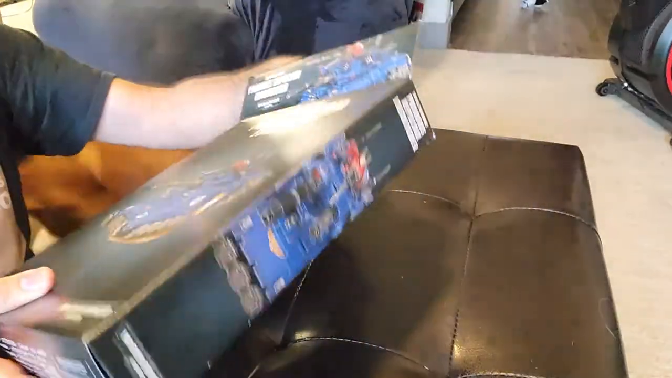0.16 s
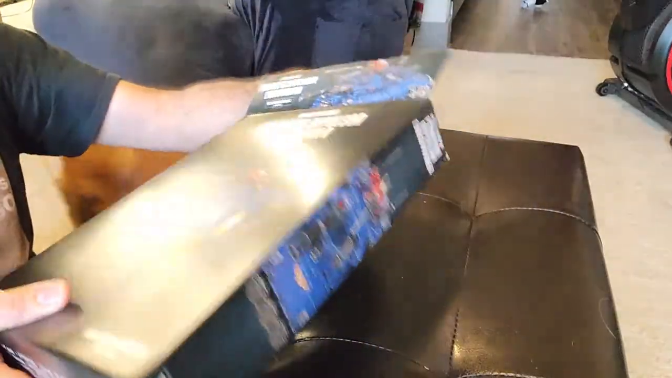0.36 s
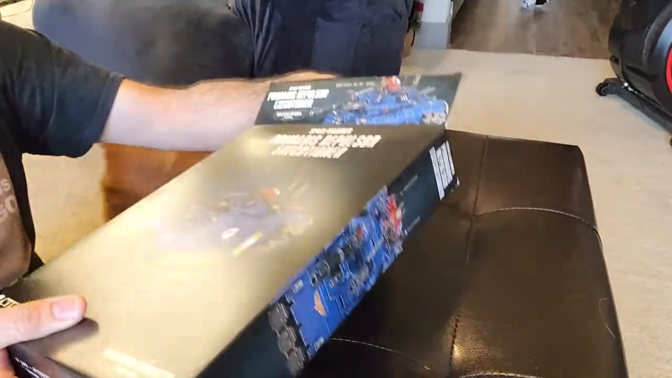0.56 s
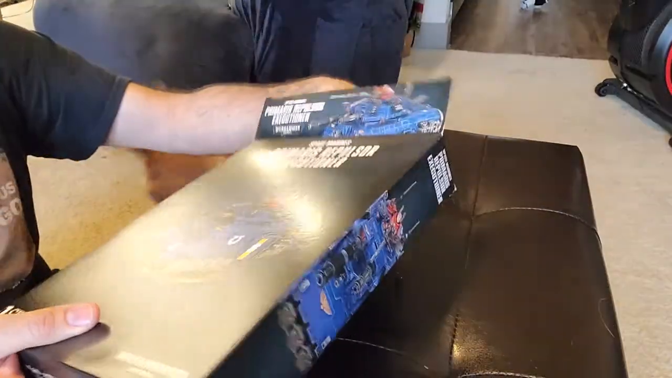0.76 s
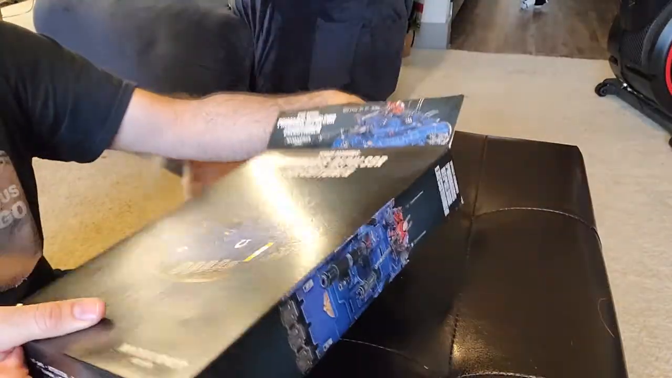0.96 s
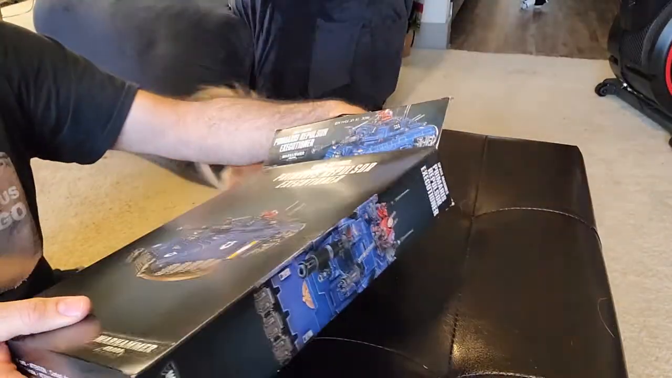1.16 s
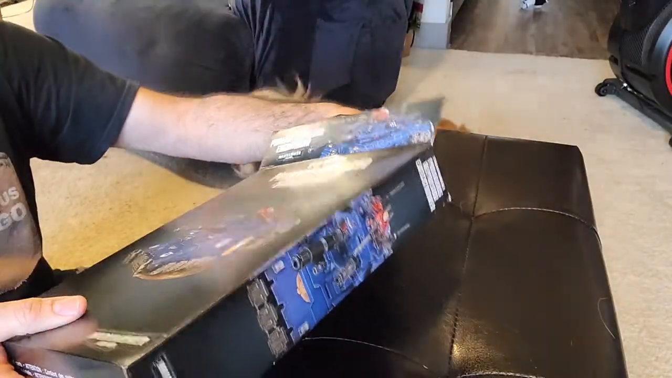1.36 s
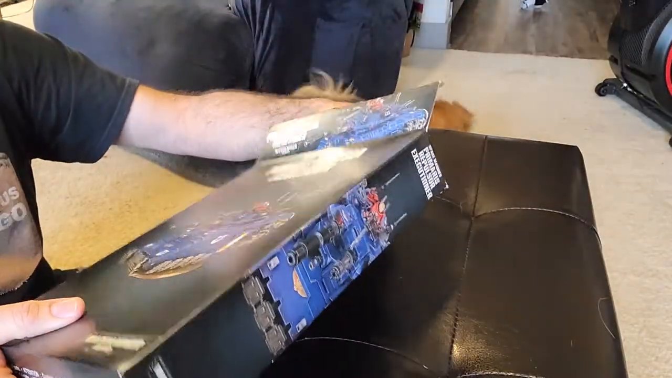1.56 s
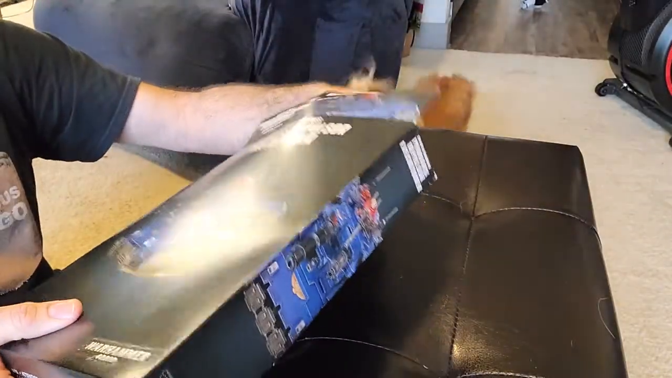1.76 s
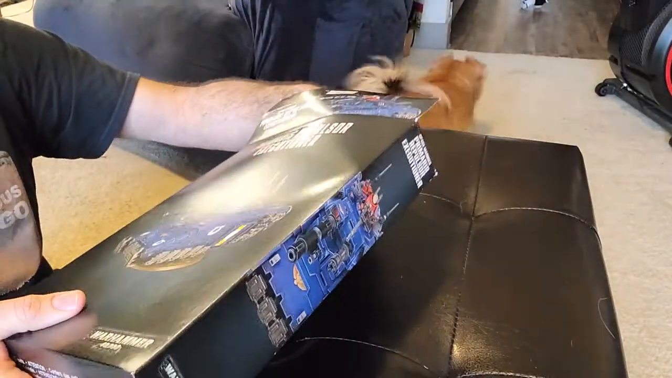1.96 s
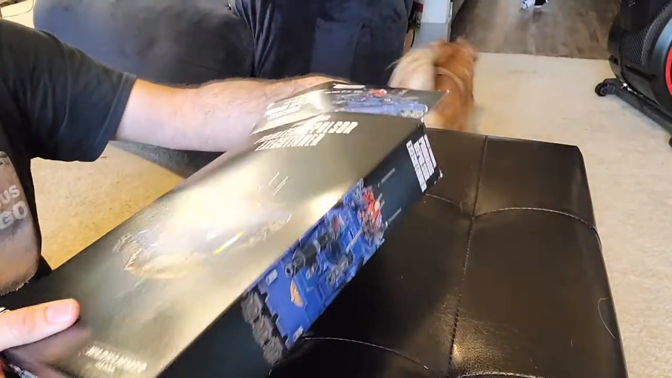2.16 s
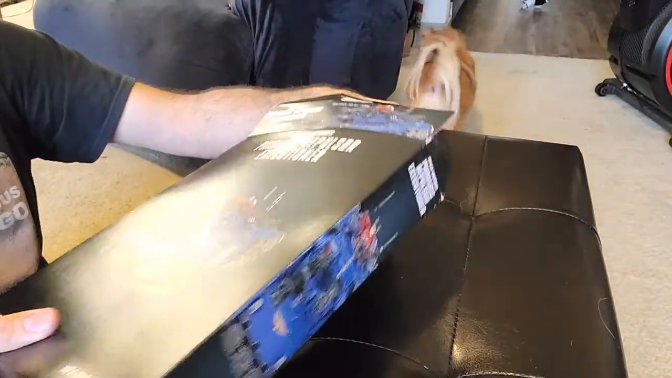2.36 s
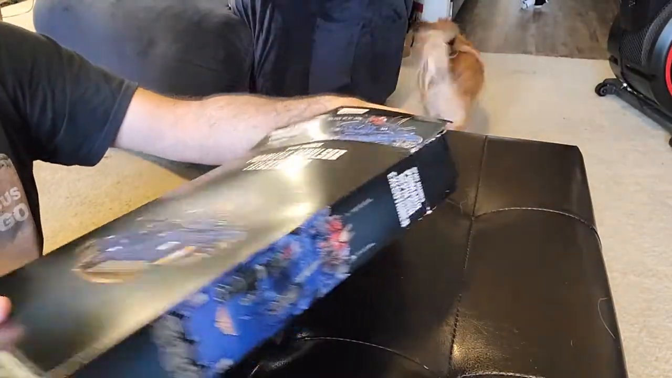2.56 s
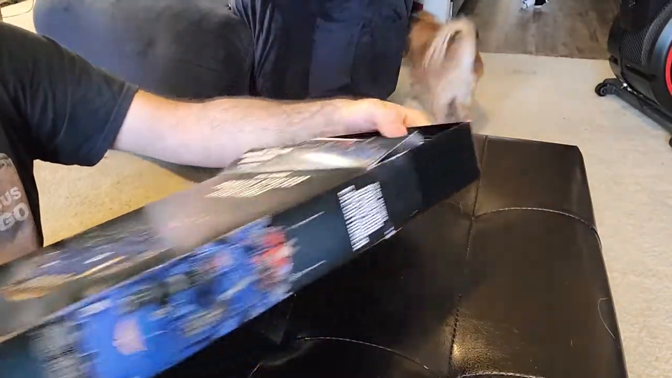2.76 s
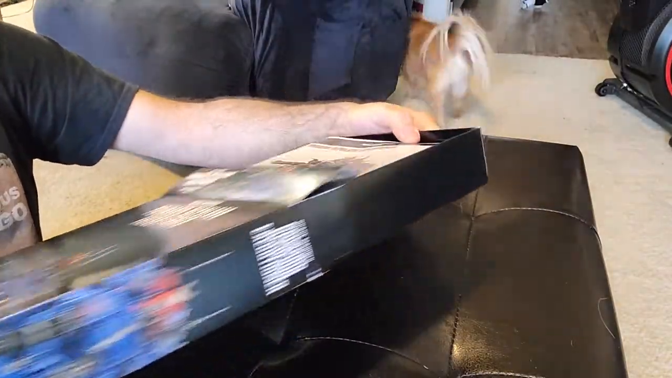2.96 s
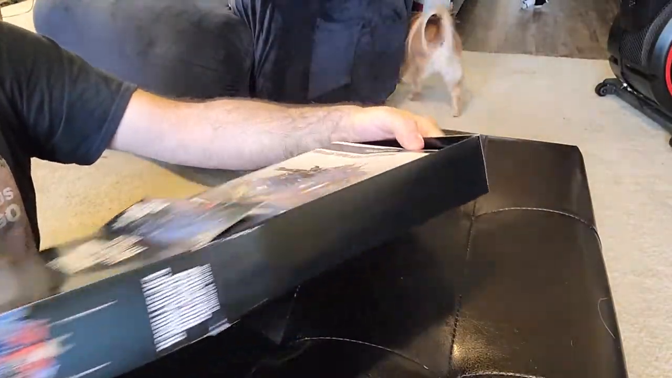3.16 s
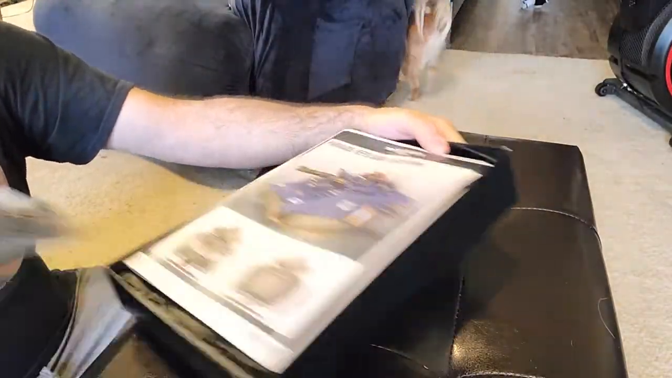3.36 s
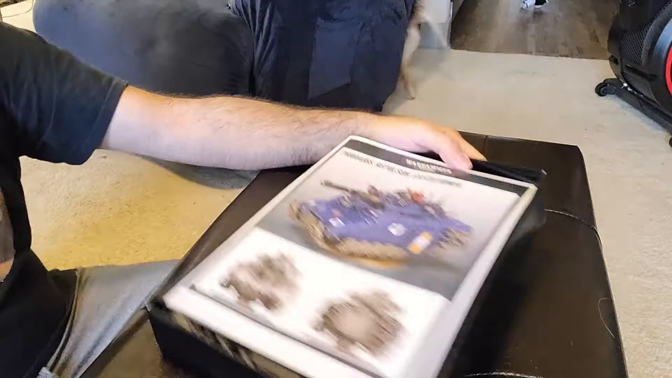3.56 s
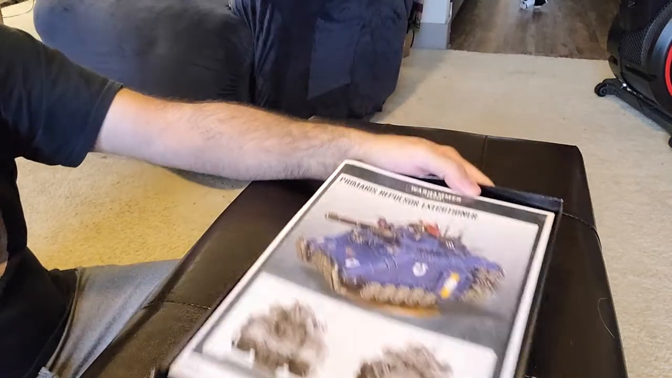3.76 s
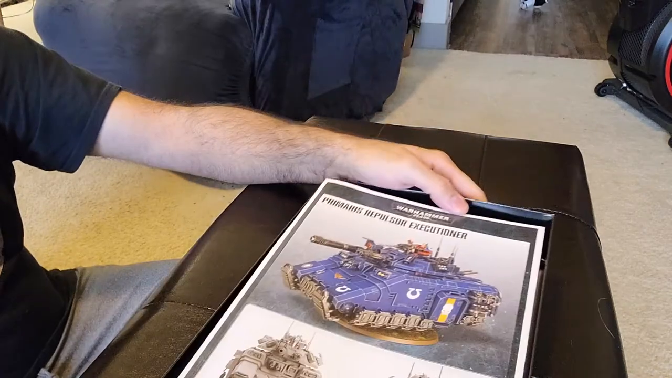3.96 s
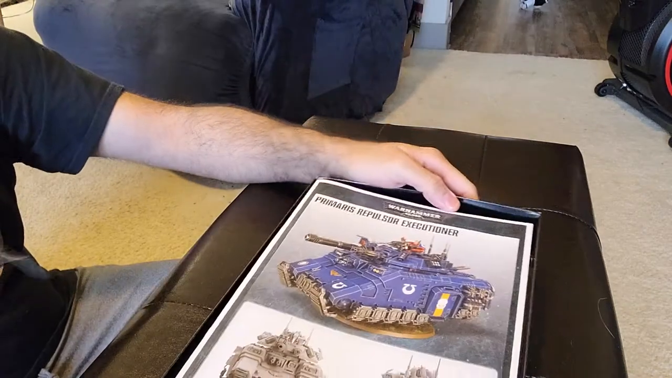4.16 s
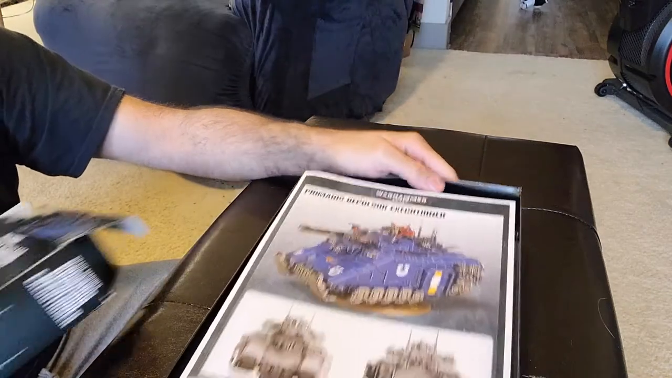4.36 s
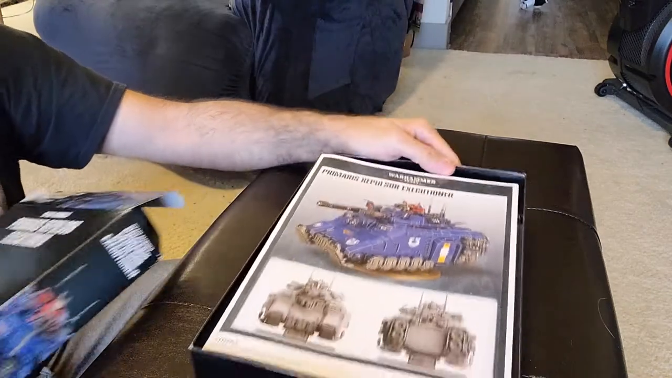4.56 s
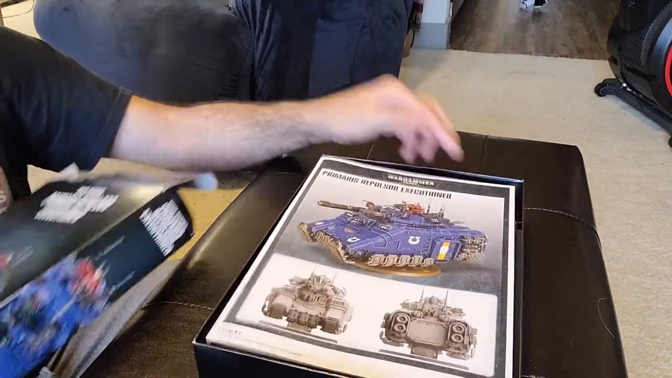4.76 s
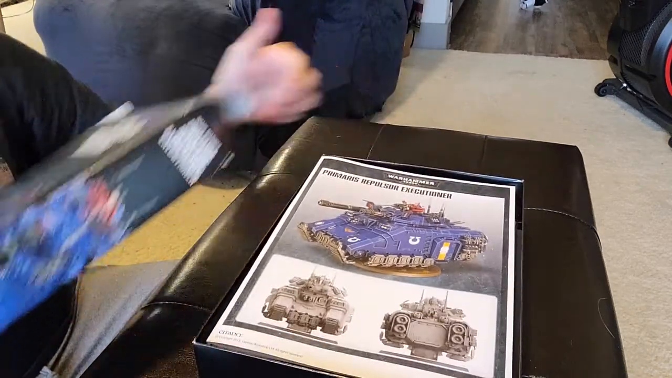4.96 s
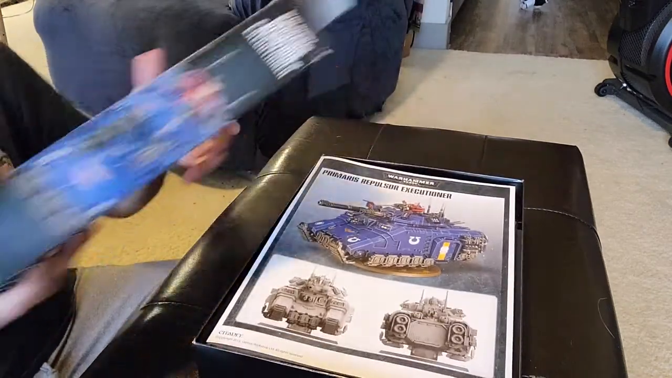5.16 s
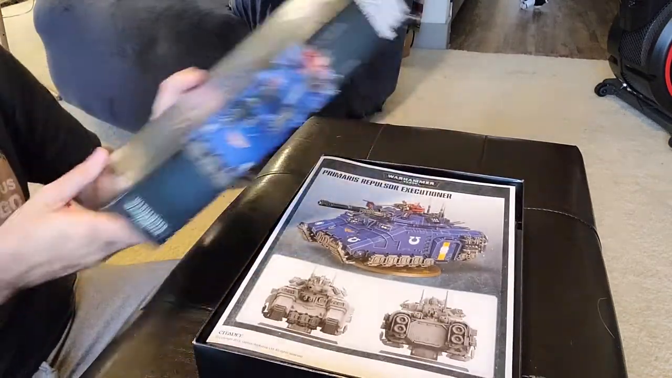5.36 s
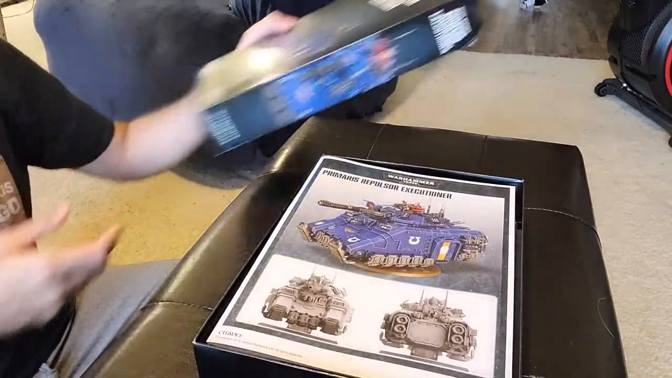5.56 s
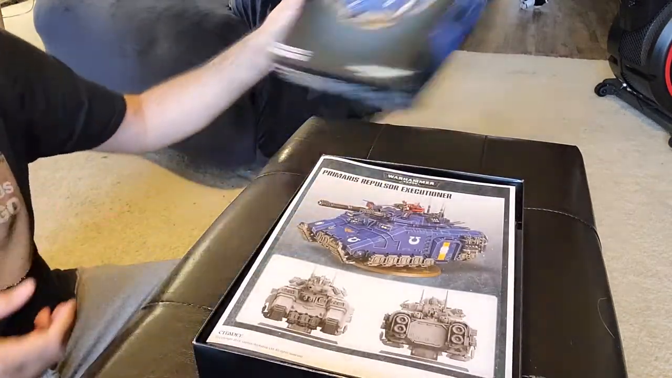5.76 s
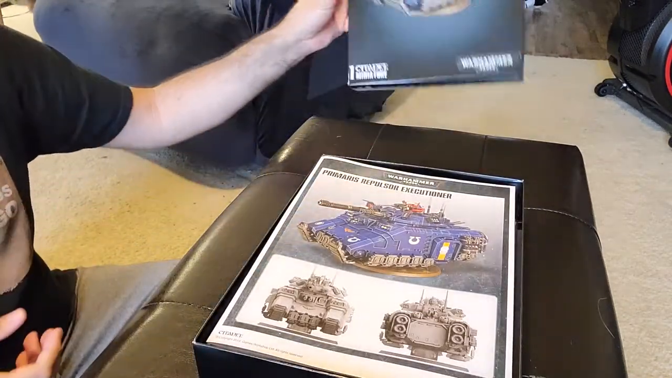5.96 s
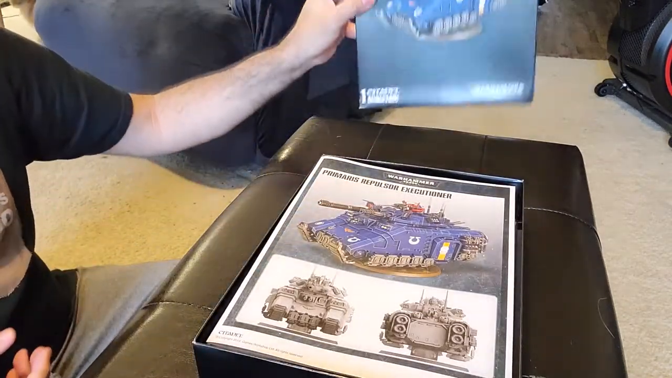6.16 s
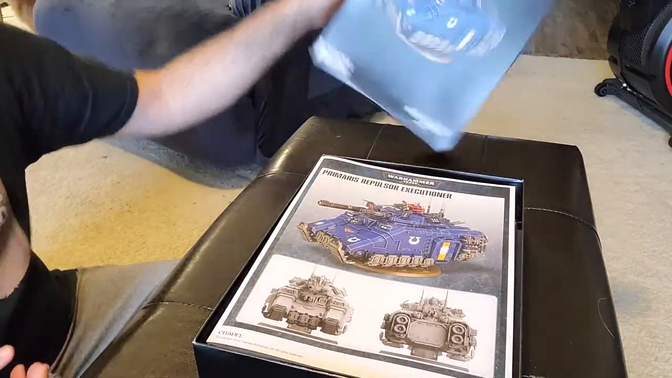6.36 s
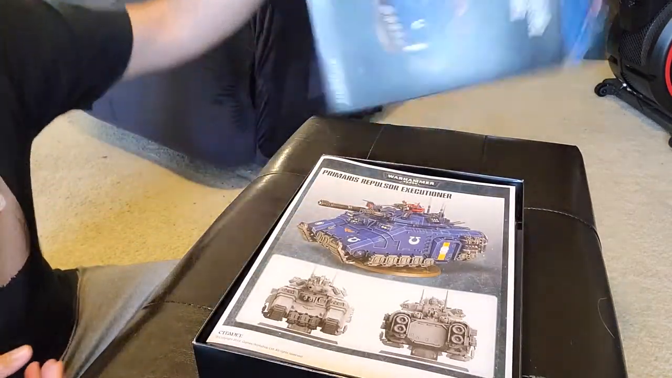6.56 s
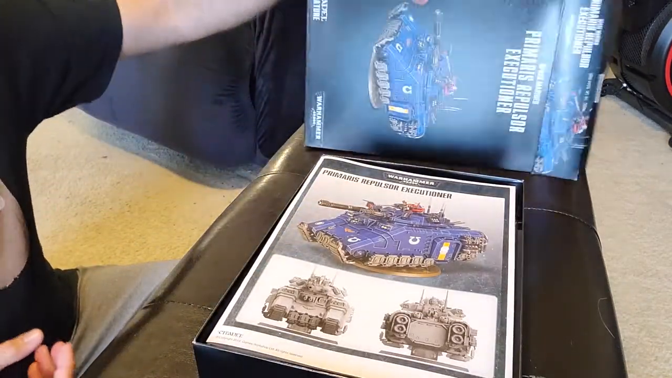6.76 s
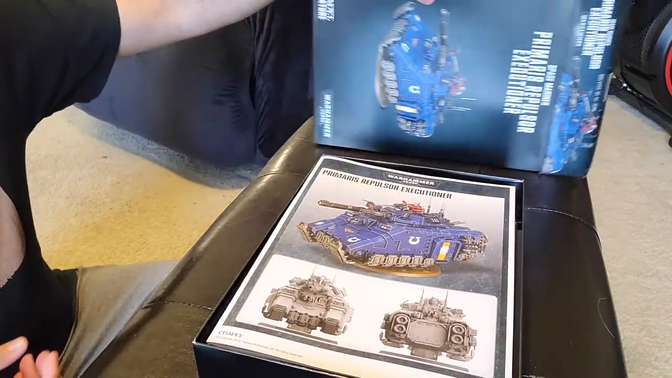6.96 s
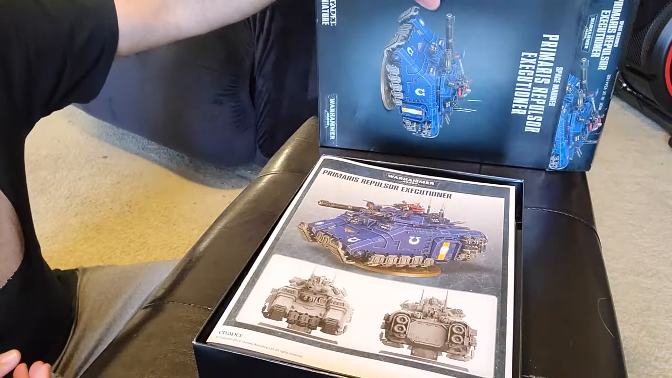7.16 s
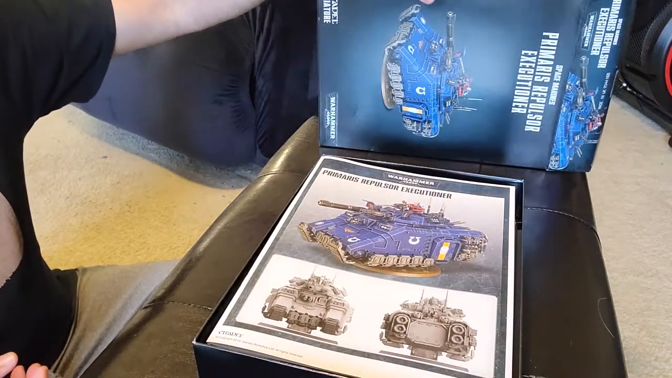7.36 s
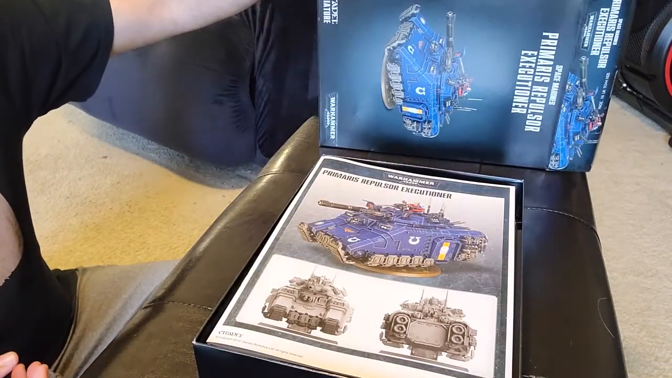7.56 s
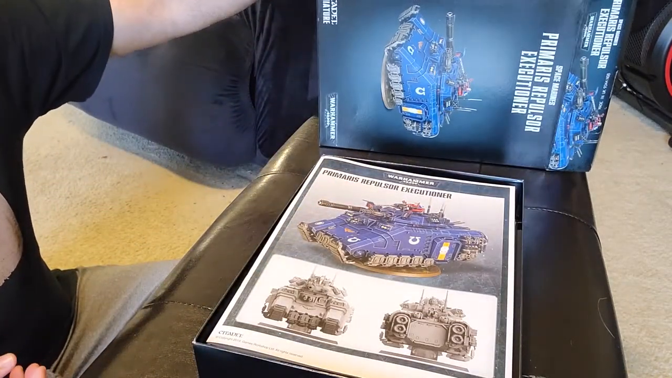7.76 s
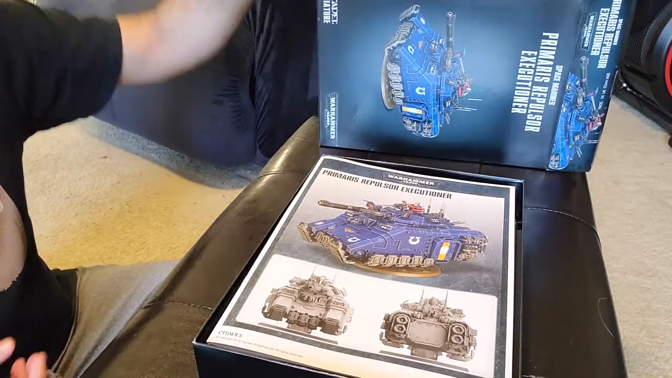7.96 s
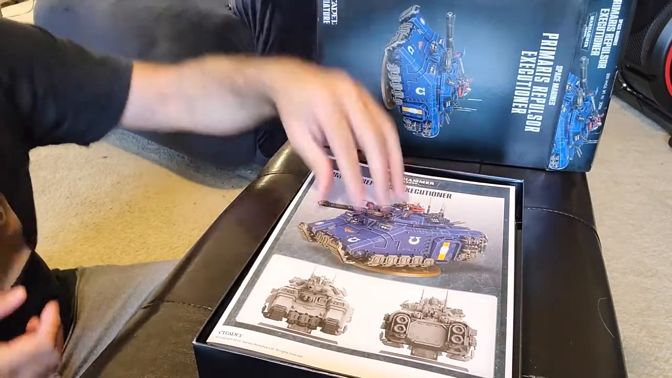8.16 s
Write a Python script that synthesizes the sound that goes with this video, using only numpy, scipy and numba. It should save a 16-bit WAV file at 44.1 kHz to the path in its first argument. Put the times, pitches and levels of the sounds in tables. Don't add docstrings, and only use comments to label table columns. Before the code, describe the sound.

Soft hollow cardboard knocks, then a rising rush of sliding card friction ending in a sharp loud pop, followed by quiet handling taps indoors.

```python
import sys
import numpy as np
from scipy import signal
from scipy.fft import rfft, irfft
from scipy.io import wavfile
from scipy.ndimage import uniform_filter1d, map_coordinates
from numba import njit

SR = 44100
rng = np.random.default_rng(int(sys.argv[2]) if len(sys.argv) > 2 else 0)


def boost(x):
    u = np.asarray(x, float) / 20
    return 10 ** u


def log_audio(samples):
    frames = np.atleast_2d(samples).T
    limited = np.clip(frames, -1, 1)
    pcm = np.round(limited * 32767).astype(np.int16)
    wavfile.write(sys.argv[1], SR, pcm)


N = 362766

# time_s, pressure_db, cavity_hz, grit_db (re pressure)
LOOSENING = [(0, -60.5, 607, 3.5), (.19, -63, 500, 2), (.41, -60, 565, -5.5), (.55, -86, 605, 12),
             (.8, -69, 703, -31), (1.0, -73.5, 680, 4.5), (1.28, -58, 749, -17), (1.5, -50, 670, -35),
             (1.6, -51, 716, -3.5), (1.9, -54.5, 538, 4), (2.06, -69, 625, -10), (2.2, -65.5, 586, -2)]
# time_s, pressure_db, cavity_hz, grit_db (re pressure)
PULLING = [
    (2.29, -40, 640, -20),
    (2.338, -32.5, 530, -9),
    (2.604, -26, 533, -4.5),
    (2.772, -26, 548, -2.5),
    (2.89, -31, 500, -0.5),
    (3.012, -30, 549, -5),
    (3.198, -27, 654, -5.5),
    (3.232, -32, 605, -10),
    (3.285, -33, 610, 2.5),
]
# time_s, pressure_db, cavity_hz, grit_db (re pressure)
HANDLING = [(3.36, -37.5, 646, 2), (3.499, -59.5, 608, 7.5), (3.66, -55, 642, -7.5),
            (3.79, -62.5, 582.4, 2), (4.07, -58, 709, -8.5), (4.29, -68, 567.5, 1.5),
            (4.43, -64.5, 552.4, 4.5), (4.619, -55.5, 683, -11.5), (4.78, -53, 685, -4),
            (5.0, -87, 607.5, 11), (5.3, -71.5, 559, 9.5), (5.57, -72, 721, 3.5), (5.851, -75.5, 723, -4),
            (6.29, -74, 657, -3), (6.6, -67.5, 621, -3.5), (6.921, -71, 621, 7.5), (7.2, -69, 628.7, -9.5),
            (8.16, -81.5, 654, -3)]
# peak_s, level_db, rise_s, fall_s, grit_db (re peak)
SCUFFS = [(0, -36, .02, 0.035, -11), (.684, -38, 0.086, 0.053, -6.5),
          (.78, -35.5, 0.041, 0.058, -4.5), (1.085, -55.5, 0.015, 0.057, -7),
          (.92, -60, 0.024, 0.038, -6), (1.44, -55, 0.045, 0.049, -5), (1.27, -44, 0.063, 0.12, -6.5),
          (1.586, -31, 0.022, 0.0094, -32), (1.668, -37.5, 0.052, 0.019, 0),
          (1.765, -34.5, 0.03, 0.049, -21), (1.9, -33, 0.042, 0.048, -8.5),
          (2.054, -48, 0.075, .1, 0.5), (2.231, -38, 0.0065, 0.0099, 4),
          (3.543, -39, 0.009, 0.012, -27), (3.689, -55, 0.15, 0.1, -6),
               (4.238, -60.5, 0.12, 0.045, -17), (4.665, -40, 0.045, 0.12, -4),
               (4.762, -46, 0.023, 0.051, -3), (5.17, -54.5, 0.012, 0.096, -4.5),
               (5.308, -55, 0.017, 0.089, -4), (5.358, -56.5, 0.044, 0.065, -10),
               (5.498, -49.5, 0.043, 0.032, 2), (5.72, -52.5, 0.012, 0.046, 1.5),
               (5.845, -56, 0.08, 0.18, -5), (6.077, -68.5, 0.039, 0.18, 7.5),
               (6.361, -41.5, 0.028, 0.079, 0.5), (6.643, -61, 0.2, 0.0097, -10),
               (6.765, -39.5, 0.053, 0.052, -8), (6.816, -47.5, 0.0082, 0.025, 5),
               (6.874, -39.5, 0.011, 0.02, -26), (7.141, -62.5, 0.056, 0.056, 0),
               (8.226, -45, 0.024, .05, 3.5)]
# peak_s, level_db, rise_s, fall_s
SWISHES = [
    (5.25, -77, 0.22, 0.36),
    (0.23, -63, 0.061, 0.055),
    (.412, -59.5, 0.034, 0.024),
    (1.586, -58.5, 0.053, 0.018),
    (3.69, -69.5, 0.11, 0.47),
    (4.134, -70, 0.026, 0.031),
    (4.42, -70.5, 0.14, 0.2),
    (4.675, -63, 0.01, 0.03),
    (4.85, -79, 0.062, 0.19),
    (1.45, -77, 0.037, .03),
]
# peak_s, level_db, rise_s, fall_s
BENDS = [(0, -57, .05, 0.16), (.2, -59.5, 0.16, 0.32), (.466, -58, 0.16, 0.032), (.686, -64, 0.076, .045),
         (1.4, -59, 0.23, 0.33), (1.67, -31.5, 0.1, 0.05), (1.88, -42, 0.071, 0.064),
         (2.64, -30.5, 0.03, 0.029), (2.9, -44.5, 0.072, 0.7), (3.276, -32, 0.062, 0.041),
         (3.34, -37.5, 0.11, 0.13), (4.18, -55, 0.14, 0.051), (4.7, -44, .08, 0.04),
         (4.78, -51, 0.13, 0.14), (5.345, -42, 0.11, 0.06), (5.2, -56.5, 0.052, 0.085),
         (6.79, -33.5, 0.067, 0.022), (6.85, -38.5, 0.023, 0.063), (8.226, -54, 0.12, .05)]


def rubbing():
    grip_db, cavity_hz, grit_db = curves(LOOSENING + PULLING + HANDLING)
    scuffs = SCUFFS
    ringing = boost(grip_db) + swells([row[:4] for row in scuffs])
    grit_rows = [(s, db + grit, rise, fall) for s, db, rise, fall, grit in scuffs]
    scuffing = swells(grit_rows, steep=0.97)
    scraping = boost(grip_db + grit_db) + scuffing
    hissing = boost(grip_db + grit_db - 23) + boost(-25) * scuffing + swells(SWISHES)
    flexing = boost(-21) * ringing + swells(BENDS)

    catch = boost(0.9 * walk(40) + 0.8 * walk(150))
    body = box_body(slips(rate=350, spread_db=2.2, bed=1.2) * catch, cavity_hz)
    edges = [edge_friction(catch, cavity_hz, db, scraping, hissing) for db in (-4.5, -4, -4)]
    flex = [panel_flex(db) * flexing for db in (-3.5, -12, -12)]
    return ringing * body + edges[0] + flex[0], np.array(edges[1:]) + flex[1:]


# pitch_hz, width_hz, level_db
PANELS = [(549, 110, -8), (1620, 14, -32.5), (2710, 480, -30.5), (3140, 89, -20.5)]


def box_body(drive, cavity_hz):
    cavity = band(band(drive, cavity_hz, 130), cavity_hz, 420)
    extra_modes = band(drive, 0.57 * cavity_hz, 150) + band(drive, 3.1 * cavity_hz, 120)
    walls = sum(boost(db) * band(drive, hz, width) for hz, width, db in PANELS)
    low_wall = band(band(drive, 410, 160), 450, 430)
    return level(cavity, -6.0) + level(extra_modes, -27.5) + level(walls, -12.0) + level(low_wall, -14.5)


# pitch_hz, level_db (per Hz)
SCRAPE = [(530, -27), (900, -5), (1660, -4.5), (2280, -11.5), (2630, -7.5), (4400, -12), (4900, -13.5),
          (7500, -12.5), (9750, -24), (16500, -120)]
# time_s, share
SHADE = [(0, .01), (.5, 0.078), (.75, 0.26), (1.3, 0.5), (1.5, .1), (1.68, 0.35), (1.9, 0.34), (2.3, .01),
         (3.3, .01), (4.5, 0.009), (4.72, 0.3), (5.0, 0.4), (5.5, 0.39), (6.3, 0.47), (6.8, 0.41),
         (8.2, 0.46)]


def edge_friction(catch, cavity_hz, share_db, scraping, hissing):
    fine = slips(rate=2500, spread_db=2.5, bed=1.0) * catch
    drift = (uniform_filter1d(cavity_hz, 4000) / 580) ** 0.9
    scrape = level(colour(patchy(fine, 899, drift, count=13), SCRAPE), share_db)
    scrape = scrape - np.clip(curves(SHADE)[0], 0, 1) * band(scrape, 5700, 7000)
    hiss = level(band(band(fine, 10500, 11000), 11000, 12000), share_db + 13.0)
    return scraping * scrape + hissing * hiss


def patchy(x, low_hz, drift, count):
    centres = low_hz * 2 ** ((np.arange(count) + 0.76 * rng.random(count)) / 5)
    out = 0.3 * x
    for hz in centres:
        moving_hz = hz * drift * (1 + 0.055 * walk(6))
        out = out + boost(3.5 * walk(18)) * band(x, moving_hz, 35 + 0.065 * hz)
    return out


def panel_flex(db):
    return level(band(band(rng.standard_normal(N), 89, 220), 120, 290), db)


def slips(rate, spread_db, bed):
    chance = rng.random((3, N))
    sign = np.sign(chance[1] - 0.5)
    clicks = (chance[0] < rate / SR) * sign * boost(-spread_db * np.log(chance[2] + 0.11))
    return level(clicks, 0) + bed * rng.standard_normal(N)


# start_s, length_s, from_hz, to_hz, level_db
STREAKS = [(0.17, 0.13, 2700, 3000, -61.5), (0.36, 0.051, 3000, 2940, -57), (0.39, 0.034, 2740, 2870, -53),
           (0.078, .3, 510, 420, -65), (0.62, 0.28, 455, 460, -53), (1.383, 0.093, 430, 480, -52.5),
           (1.28, 0.086, 3100, 3600, -65), (0.39, 0.02, 6000, 4800, -55), (1.487, 0.059, 3200, 2900, -62.5),
           (1.565, 0.037, 5400, 4660, -58), (1.657, 0.023, 1140, 1140, -40.5),
           (1.733, 0.03, 1500, 1130, -45.5), (1.741, 0.045, 2000, 2030, -49.5),
           (6.41, 0.063, 1770, 1640, -58.5), (2.43, .11, 710, 800, -35.5), (2.64, 0.16, 810, 885, -37),
           (2.327, 0.23, 1285, 1830, -42.5), (2.3, 0.21, 1700, 1660, -45.5), (2.4, 0.17, 1990, 2160, -48.5),
           (2.71, 0.33, 1860, 2110, -42), (2.4, 0.54, 2500, 2720, -42.5), (2.65, 0.35, 995, 1176, -41),
           (2.92, 0.12, 995, 1028, -36.5), (2.928, 0.084, 1700, 1660, -36.5), (2.8, 0.44, 1994, 2225, -46),
           (3.015, 0.21, 1301, 1230, -41), (3.1, 0.17, 3000, 3420, -52.5), (3.249, 0.097, 265, 274, -39),
           (3.373, 0.042, 1930, 3300, -40), (3.524, 0.045, 266, 280, -45.5), (3.528, 0.032, 960, 1070, -49),
           (4.537, 0.052, 2800, 3400, -66), (4.68, 0.069, 1570, 1450, -56), (4.748, 0.068, 1600, 1540, -54),
           (4.747, 0.1, 3150, 3000, -62), (5.159, 0.046, 980, 994, -66.5), (5.3, 0.12, 3500, 3600, -67),
           (5.31, 0.026, 990, 1030, -52), (5.473, 0.04, 2160, 1200, -52), (5.712, 0.039, 1230, 1160, -58.5)]


def streaks():
    out = np.zeros(N)
    drive = slips(rate=500, spread_db=3.0, bed=0.83) * boost(3.0 * walk(50))
    for s, length, from_hz, to_hz, db in STREAKS:
        n, i = int(length * SR), int(s * SR)
        hz = np.linspace(from_hz, to_hz, n)
        swell = np.sin(np.pi * np.arange(n) / n) ** 0.81
        out[i:i + n] += swell * level(band(drive[i:i + n], hz, 0.049 * from_hz), db)
    return out


# start_s, peak_db, ring_hz, ring_t60_s
THUDS = [(.618, -42, 700, 0.028), (0.646, -39, 480, .03), (.672, -34, 760, .03), (.764, -30, 816, 0.033),
         (1.074, -41.5, 722, .053), (1.201, -43, 445, 0.098), (1.547, -32, 620, 0.08),
         (1.5685, -30, 730, 0.07), (1.63, -15.5, 359.5, 0.048), (1.638, -16.5, 558, 0.034),
         (1.654, -33, 780, .068), (1.753, -32, 620, .049), (1.827, -32, 704, 0.04),
         (1.877, -24.5, 521, 0.057), (2.27, -30, 737, 0.055), (2.632, -7, 521, 0.042),
         (2.681, -17.5, 575, 0.043), (3.267, -23, 610, 0.044), (3.29, -27, 287, 0.12),
         (3.306, -19.5, 435, .05), (3.693, -44, 630, 0.049), (4.078, -44.5, 630, 0.057),
         (4.455, -45.5, 527, 0.13), (6.355, -33.5, 760, .07), (6.744, -32.5, 575, 0.041),
         (6.863, -32.5, 637, .045), (7.149, -52.5, 620, 0.043)]
# start_s, peak_db, ring_hz, crack_db (re peak), crack_hz
SNAPS = [(.033, -34.5, 457, -10.5, 3070), (0.2016, -29.5, 780, 1.5, 3700), (.896, -52, 770, -2, 1460),
         (1.288, -33.5, 718, -19, 3320), (2.23, -35.5, 492, -23, 1440), (3.297, -23, 514, -6, 2500),
         (3.3160, -9, 743, 4.5, 1330), (3.323, -12.5, 569, -7, 1100), (3.5316, -33.5, 853, -27, 979),
         (3.599, -55, 250, 4, 6960), (4.121, -41.5, 770, -1, 3410), (4.571, -42, 930, 3.5, 1500),
         (4.668, -38, 730, 15.5, 6170), (4.748, -30, 727, 6.5, 4560), (5.152, -47, 615, -6, 2194),
         (5.298, -39.5, 514, -6, 2230), (5.714, -49, 710, -6.5, 1330), (6.731, -27, 564, 2.5, 2160),
         (6.8125, -35, 674, -18, 1400), (8.197, -42.5, 933, -8, 4500)]


def blows():
    thuds = [(s, db, hz, -23 - 0.3 * (db + 28.5), 1500, t60) for s, db, hz, t60 in THUDS]
    snaps = [(*row, 0.16) for row in SNAPS]
    return sorted(thuds + snaps)


# pitch_hz, level_db (per Hz)
CRACK = [(700, -29), (1400, -0.5), (3300, 3.5), (7000, -1.5), (10000, -5.5), (13000, -3.5), (16000, -12)]


def knocks():
    out, t = np.zeros(N + SR), np.arange(SR // 3) / SR
    for s, peak_db, hz, crack_db, crack_hz, t60 in blows():
        noise = rng.standard_normal((2, len(t)))
        fade = decay(t, max(t60, 0.01))
        push = 1.1 * np.sin(2 * np.pi * hz * t) * (t < 1.5 / hz)
        rattle = push + noise[0] * fade
        ring = band(rattle, hz, 0.05 * hz) + 0.63 * band(rattle, 0.62 * hz, 0.91 * hz)

        chatter = boost(2.5 * np.repeat(noise[0, ::90], 90)[:len(t)])
        snap = noise[1] * chatter * (np.exp(-t / 0.0072) + 0.15 * fade)
        snap[0] = 4.9
        crack = 0.47 * colour(snap, CRACK) + band(snap, crack_hz, 0.38 * crack_hz)

        blow = 1.2 * ring / np.abs(ring).max() + boost(crack_db) * crack / np.abs(crack).max()
        i = int((s + 0.0015) * SR)
        out[i:i + len(t)] += boost(peak_db) * blow
    return out[:N]


# start_s, peak_db, pitch_hz
THUMPS = [(0.467, -39.5, 61), (0.723, -39.5, 41), (1.624, -28, 105), (1.659, -31, 63), (1.879, -42, 72),
          (2.628, -24.5, 119), (3.293, -26, 113), (3.314, -25, 185), (4.669, -42, 173), (5.296, -40, 67.4),
          (5.339, -37, 86), (6.743, -29, 198), (6.756, -27.5, 108), (6.777, -29, 77), (6.829, -30, 96)]


def thumps():
    out, t = np.zeros(N + SR), np.arange(SR // 3) / SR
    envelope = np.exp(-t / 0.015) * (1 - np.exp(-t / 0.002))
    for s, peak_db, hz in THUMPS:
        i = int(s * SR)
        out[i:i + len(t)] += 1.4 * boost(peak_db) * np.sin(2 * np.pi * hz * t) * envelope
    return out[:N]


# start_s, peak_db, ring_hz, ring_t60_s
TICKS = [(0.203, -33, 5840, 0.0044), (.416, -32.5, 6170, 0.0046), (.417, -41, 12500, .002),
         (.656, -41, 1700, 0.015), (0.748, -52, 1620, .01), (0.761, -44, 1790, .01),
         (1.296, -42.5, 3440, 0.013), (1.738, -42, 2090, .012), (2.044, -44, 1570, .012),
         (4.573, -32, 11500, .002), (1.203, -52, 6000, .002), (1.568, -43, 4800, .012),
         (1.641, -34, 5500, .003), (1.662, -34.5, 2010, 0.013), (1.88, -35.5, 6140, .003),
         (2.640, -15.5, 1560, 0.015), (3.268, -25, 3180, 0.012), (3.299, -16, 2802, 0.0028),
         (3.3168, -7.5, 4000, .002), (3.3172, -8, 11500, .002), (3.320, -8, 3300, 0.0067),
         (3.3245, -16, 3300, .004), (3.328, -17, 3300, .004), (3.347, -26, 2000, .006),
         (3.534, -44, 2870, .012), (3.634, -39, 1520, 0.014), (4.562, -42, 9000, .001),
         (4.636, -44, 2820, .01), (4.660, -33, 2800, 0.012), (4.669, -15.5, 9300, 0.004),
         (4.670, -23, 13600, .002), (4.680, -33, 12800, .002), (4.735, -39, 3050, .012),
         (4.757, -39, 12500, .002), (4.771, -40, 3000, .003), (4.801, -42, 3020, 0.013),
         (4.89, -52.5, 5500, 0.009), (5.154, -56.5, 6100, 0.0021), (5.302, -44.5, 2200, 0.013),
         (5.471, -45, 1820, .012), (5.49, -46, 2970, 0.011), (5.716, -54, 3950, .01),
         (6.351, -38.5, 1490, 0.016), (6.732, -26, 3800, 0.004), (6.734, -29, 7600, .003),
         (6.741, -33, 3800, .005), (6.751, -36, 7000, .003), (6.814, -38, 3200, 0.0033),
         (6.864, -33, 1520, 0.0069), (8.199, -46.5, 3770, .008)]


def ticks():
    out, t = np.zeros(N + SR), np.arange(SR // 20) / SR
    for s, peak_db, hz, t60 in TICKS:
        burst = rng.standard_normal(len(t)) * np.exp(-t / 0.0015)
        ring = band(burst, hz, 1.5 / max(t60, 0.001))
        click = ring / np.abs(ring).max() + 0.22 * band(burst, hz, 1.0 * hz)
        i = int(s * SR)
        out[i:i + len(t)] += boost(peak_db) * click / np.abs(click).max()
    return out[:N]


# jump_s, peak_db, half_length_s
SLAPS = [
    (3.3170, -2.5, 0.00041),
    (3.3207, -7.5, .0003),
    (3.326, -9, 0.00095),
]


def slaps():
    t = np.arange(N) / SR
    out = np.zeros(N)
    for s, db, half in SLAPS:
        out += boost(db) * np.sign(t - s) * np.clip(1 - np.abs(t - s) / half, 0, 1)
    return out


# start_s, length_s, pitch_hz, level_db
SQUEAKS = [
    (0.217, 0.024, 11300, -49),
    (3.594, .018, 5800, -63),
    (3.597, 0.016, 7140, -60),
    (3.596, .018, 2900, -60),
    (4.111, 0.033, 750, -45.5),
    (5.162, 0.018, 2140, -58.5),
    (4.5, 0.021, 4050, -76),
    (5.437, 0.03, 3746, -62.5),
]


def squeaks():
    out = np.zeros(N)
    for s, length, hz, db in SQUEAKS:
        n, i = int(length * SR), int(s * SR)
        swell = np.sin(np.pi * np.arange(n) / n) ** 0.56
        out[i:i + n] += swell * level(band(band(rng.standard_normal(n), hz, 56), hz, 120), db)
    return out


def scatter(x):
    t = np.arange(SR // 8) / SR
    fade = decay(t, 0.06) + 4.9 * decay(t, 0.005)
    tails = rng.standard_normal((2, len(t))) * fade
    treble = band(band(x, 4400, 12000), 5400, 24000)
    return boost(-1.5) * convolve_tails(treble, tails)


def room(x, t60):
    dull_hz = 2613
    t = np.arange(SR // 2) / SR
    noise = rng.standard_normal((3, len(t))) * decay(t, t60) * (t > 0.003)
    bass = band(noise[2], 200, 520)
    tails = [band(n, dull_hz / 2, dull_hz) + 0.67 * bass for n in noise[:2]]
    return convolve_tails(x, tails)


# start_s, length_s, from_hz, to_hz, level_db
GLIDES = [
    (7.213, .16, 1335, 1390, -67),
    (7.25, .29, 1420, 1485, -71.5),
    (7.51, .08, 1320, 1270, -69),
    (7.83, .14, 1250, 1190, -74),
    (7.472, .09, 770, 840, -68),
    (7.8, .035, 780, 770, -66),
]


def whine():
    out, t = np.zeros(N), np.arange(N) / SR
    for s, length, from_hz, to_hz, db in GLIDES:
        on = np.clip(np.minimum((t - s) / 0.01, (s + length - t) / 0.05), 0, 1)
        glide = np.sin(np.pi / 2 * np.clip(1.3 * (t - s) / length, 0, 1))
        pitch = (from_hz + (to_hz - from_hz) * glide) * (1 + 0.01 * walk(90))
        out += on * boost(db + 1.5 * walk(60)) * np.sin(2 * np.pi * np.cumsum(pitch) / SR)
    return out


# pitch_hz, width_hz, level_db
HUM = [(29.8, 2.5, -65), (119, 5.1, -75.5), (240.8, 9.6, -70.5)]
# pitch_hz, level_db (per Hz)
AIR = [(20, -12), (30, -8.5), (42, -16), (60, -14), (210, -24.5), (320, -24.5), (420, -30), (1000, -36.5),
       (1300, -34.5), (1700, -44.5), (5200, -51.5), (6800, -46.5), (7600, -42.5), (9000, -45.5),
       (16000, -47)]


def room_tone():
    hum = sum(level(band(rng.standard_normal(N), hz, width), db) for hz, width, db in HUM)
    return hum + level(colour(rng.standard_normal(N), AIR), -64.5) * boost(0.4 * walk(0.74))


def air():
    mid, side = room_tone(), room_tone()
    highpass = signal.butter(1, 350, "high", fs=SR, output="sos")
    side = signal.sosfilt(highpass, side) + 0.3 * side
    return mid * 1.31 + 0.75 * side * np.array([[1], [-1]])


def level(x, db):
    return x * boost(db) / np.sqrt(np.mean(x ** 2) + 1e-30)


def decay(t, t60):
    return np.exp(-np.log(1000) * t / t60)


def convolve_tails(x, tails):
    return np.array([signal.fftconvolve(x, h / np.sqrt(np.sum(h ** 2)))[:N] for h in tails])


@njit
def svf(x, hz, width):
    y, b, l = np.empty(len(x)), 0., 0.
    for i in range(len(x)):
        g, k = np.tan(np.pi * hz[i] / SR), width / hz[i]
        v = (b + g * (x[i] - l)) / (1 + g * (g + k))
        b, l, y[i] = 2 * v - b, l + 2 * g * v, k * v
    return y


def band(x, hz, width):
    return svf(x + 1e-18, np.ones(len(x)) * hz, float(width))


def colour(x, points):
    hz, db = np.transpose(points)
    bins_hz = np.arange(2049) * SR / 4096
    gain_db = np.interp(np.log(bins_hz + 1), np.log(hz), db, db[0] - 12, db[-1] - 12)
    cepstrum = irfft(gain_db * np.log(10) / 20)
    cepstrum[1:2048] *= 2
    cepstrum[2049:] = 0
    return signal.fftconvolve(x, irfft(np.exp(rfft(cepstrum))))[:len(x)]


def walk(rate):
    k = int(SR / rate)
    steps = np.repeat(rng.standard_normal(N // k + 1), k)
    return 1.84 * uniform_filter1d(uniform_filter1d(steps, k), k)[:N]


def curves(table):
    s, *columns = np.transpose(table)
    return [np.interp(np.arange(N) / SR, s, c) for c in columns]


def swells(rows, steep=1.):
    rounding = 1.25
    t = np.arange(0, N + 16, 16) / SR
    gain = np.zeros(len(t))
    for s, db, rise, fall in rows:
        away = np.maximum((s - t) / rise, (t - s) / fall)
        gain += boost(db - 20 * steep * away ** rounding)
    return np.interp(np.arange(N) / SR, t, gain)


# time_s, left_delay_samples, left_minus_right_db
PLACE = [(0, -2, 2.5), (1.8, -2.5, -1), (2.15, 9, 0.5), (2.8, 6.5, -4), (3.2, 4.5, -2.5), (3.4, 4.5, -2.5),
         (3.8, 3.5, -0.5), (4.2, -3, -3.5), (4.7, -2.5, 0), (5.2, -2, 0.5), (6.7, -3, 0), (8.23, -3, -1)]


def scene():
    rub, spread = rubbing()
    hits = knocks() + thumps() + ticks() + slaps()
    box = rub + hits + streaks()
    lag, pan_db = curves(PLACE)
    ports = []
    for side in (1, -1):
        delayed = map_coordinates(box, [np.arange(N) - side * lag / 2], order=3)
        ports.append(boost(side * pan_db / 2) * delayed)
    near = np.array(ports) + spread + scatter(hits) + squeaks()
    far = whine()
    distant = 0.63 * room(far, 0.298) + 0.96 * far
    return near + boost(-11.5) * room(box, 0.2) + distant + air()


def band_limit(x):
    return signal.sosfilt(signal.butter(12, 16640, fs=SR, output="sos"), x)


# pitch_hz, level_db
MIC = [(15, 0), (6000, 0), (7500, 0), (8300, -5.5), (10500, -10), (20000, 0.5)]


def record(dry):
    heard = np.array([np.clip(colour(port, MIC), -1, 1) for port in dry])
    lowpass = signal.ellip(12, 0.2, 70, 15720, fs=SR, output="sos")
    mix = np.clip(signal.sosfilt(lowpass, heard), -1, 1)
    return band_limit(mix)


dry = scene()
out = record(dry)
log_audio(out)
```